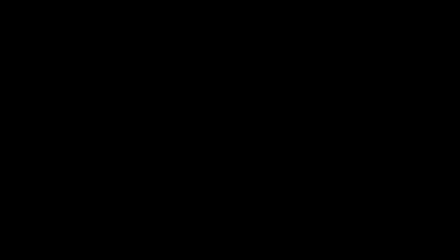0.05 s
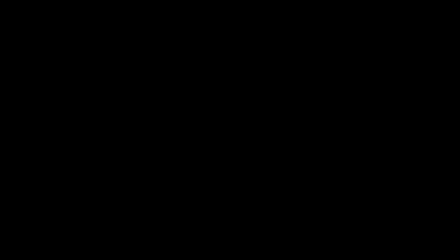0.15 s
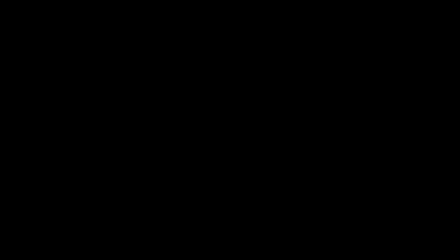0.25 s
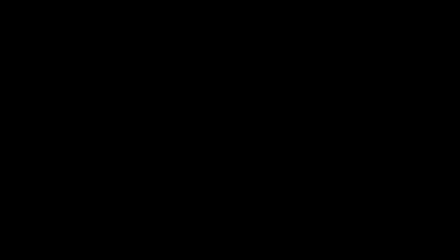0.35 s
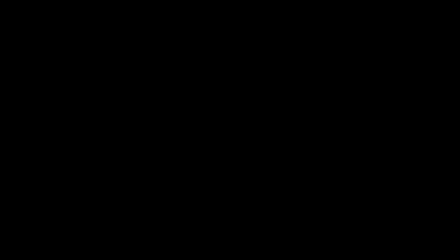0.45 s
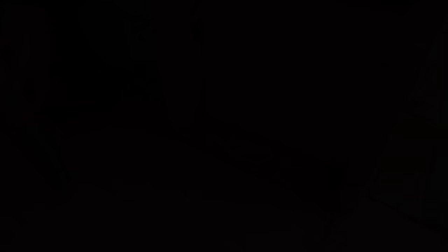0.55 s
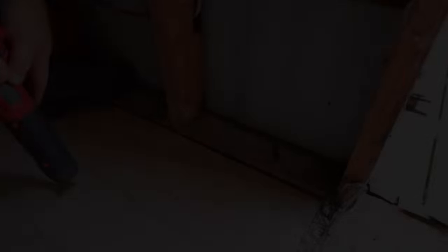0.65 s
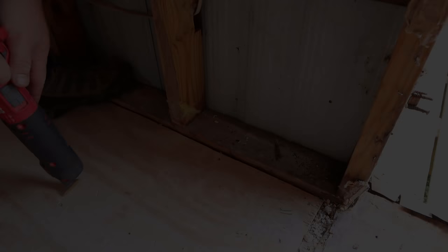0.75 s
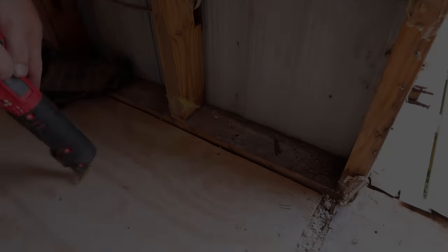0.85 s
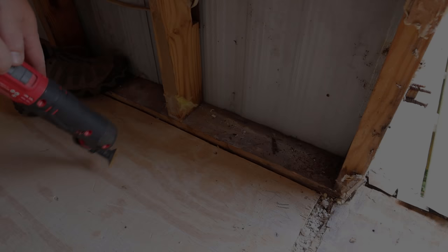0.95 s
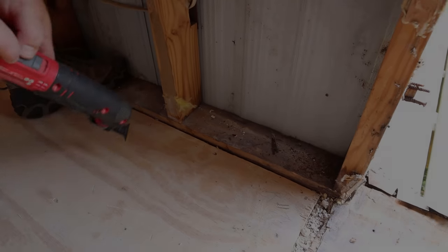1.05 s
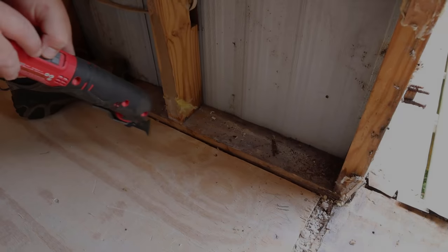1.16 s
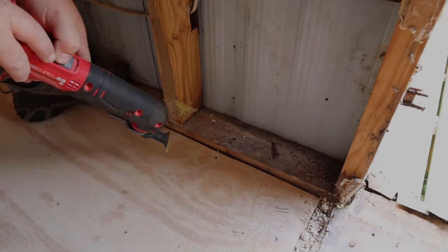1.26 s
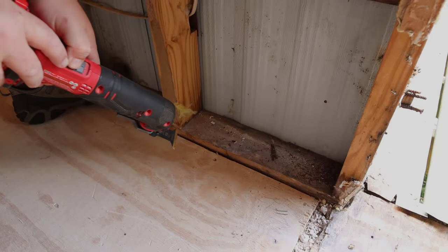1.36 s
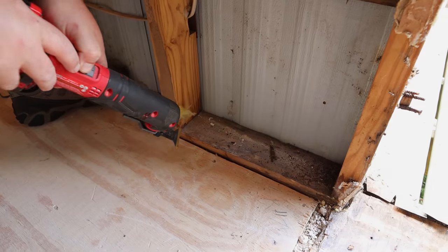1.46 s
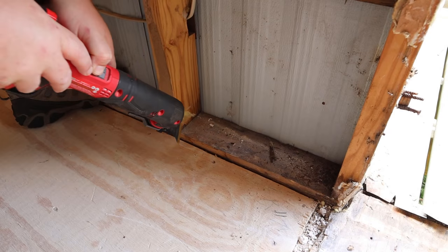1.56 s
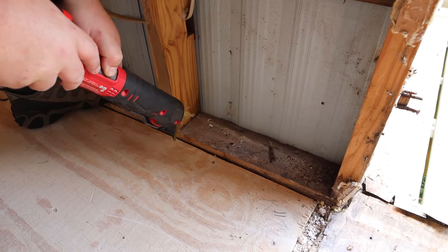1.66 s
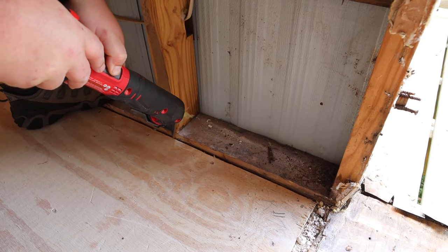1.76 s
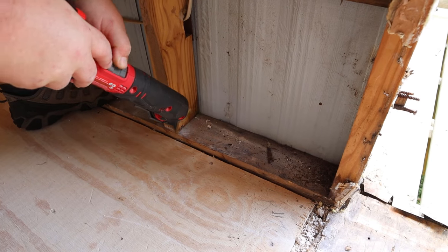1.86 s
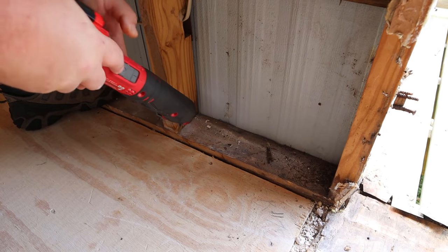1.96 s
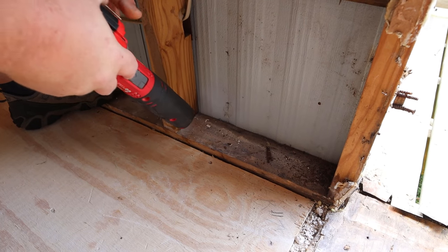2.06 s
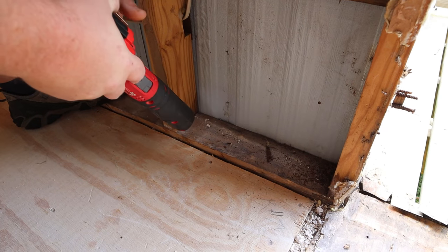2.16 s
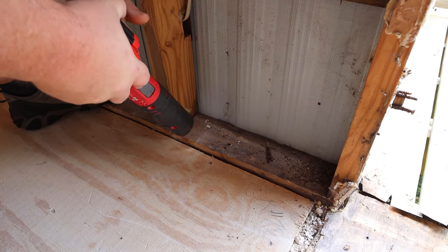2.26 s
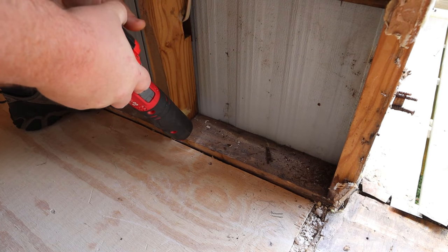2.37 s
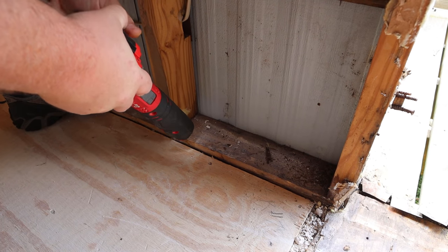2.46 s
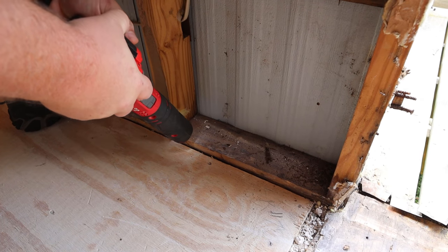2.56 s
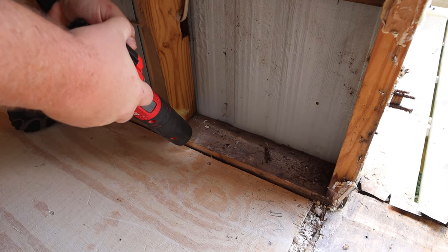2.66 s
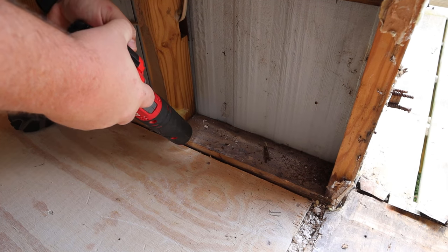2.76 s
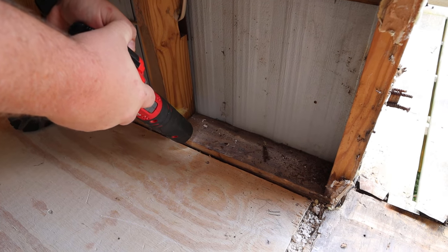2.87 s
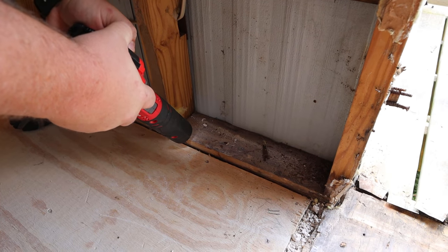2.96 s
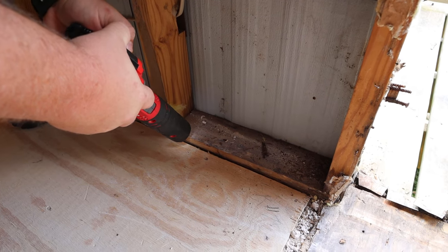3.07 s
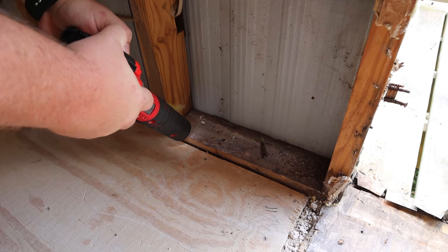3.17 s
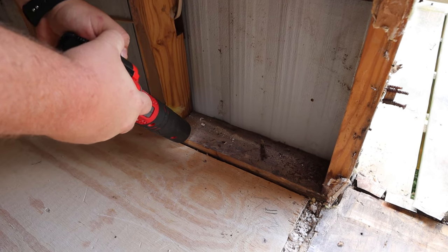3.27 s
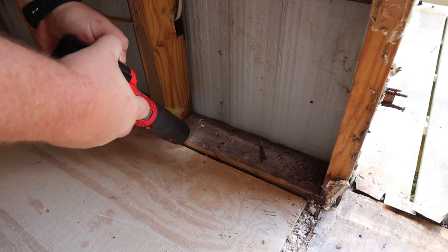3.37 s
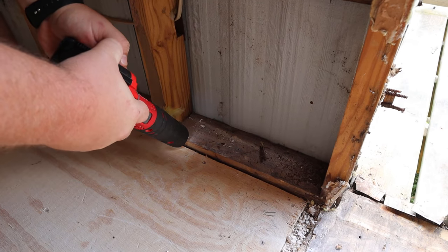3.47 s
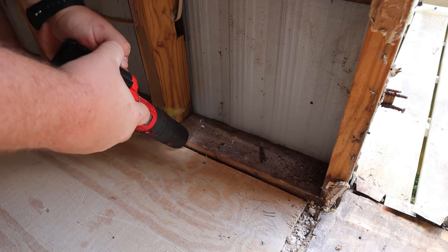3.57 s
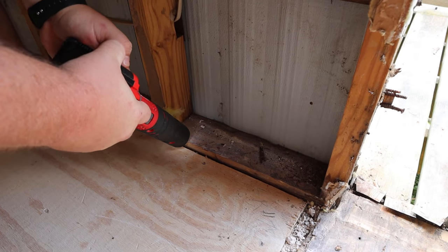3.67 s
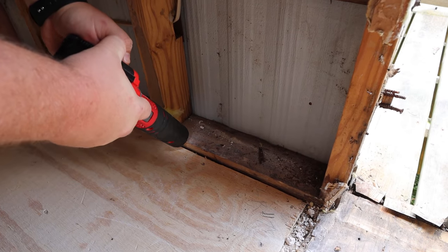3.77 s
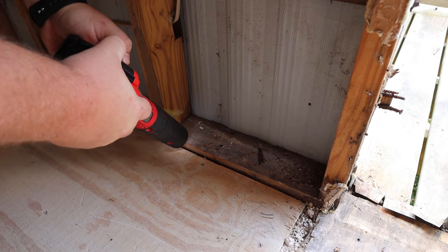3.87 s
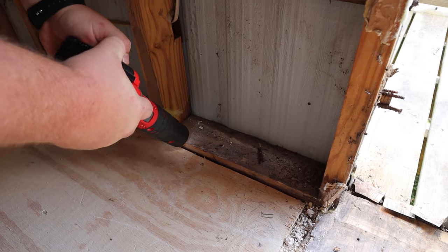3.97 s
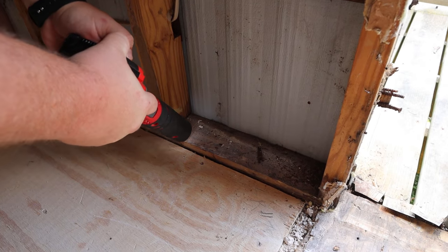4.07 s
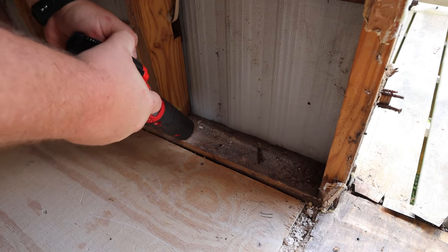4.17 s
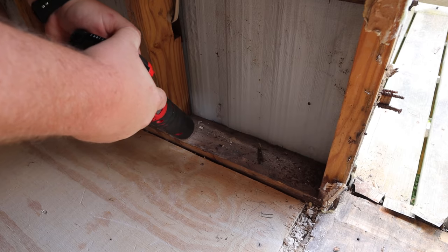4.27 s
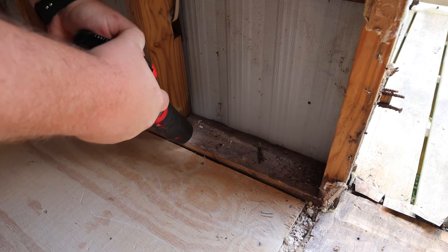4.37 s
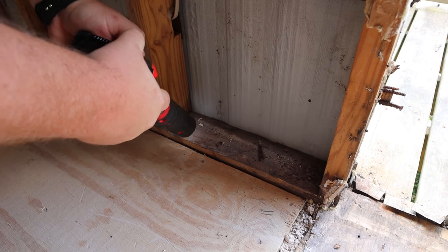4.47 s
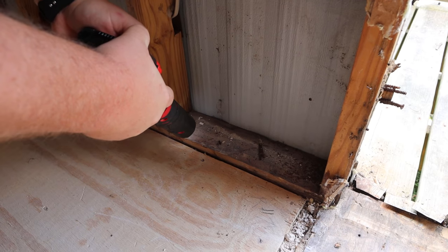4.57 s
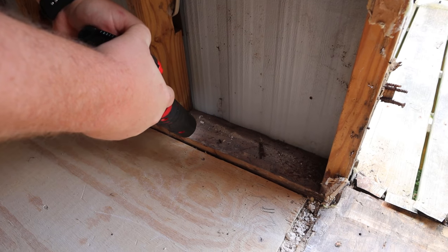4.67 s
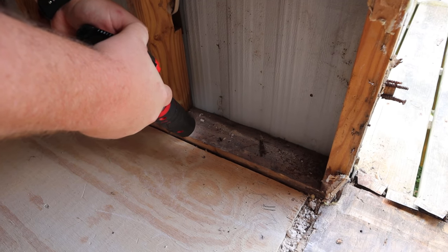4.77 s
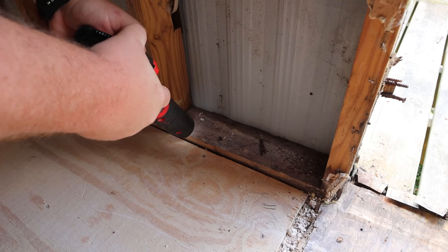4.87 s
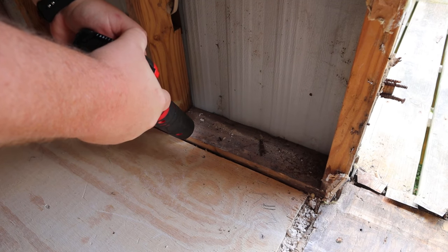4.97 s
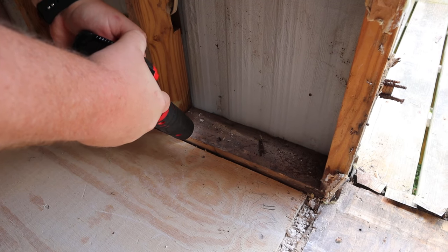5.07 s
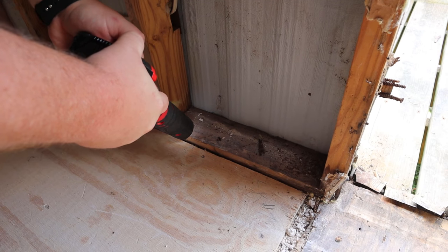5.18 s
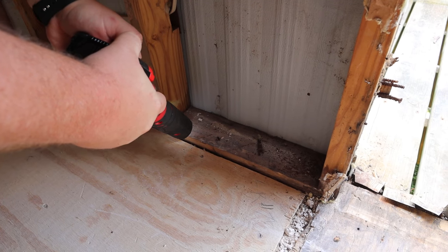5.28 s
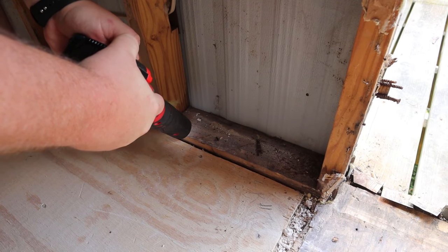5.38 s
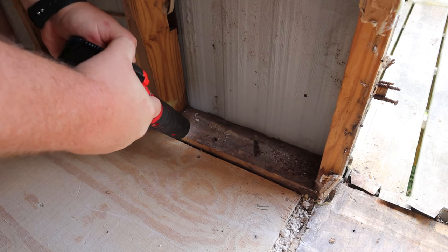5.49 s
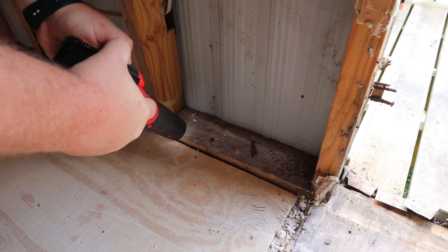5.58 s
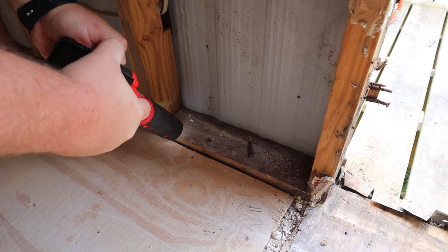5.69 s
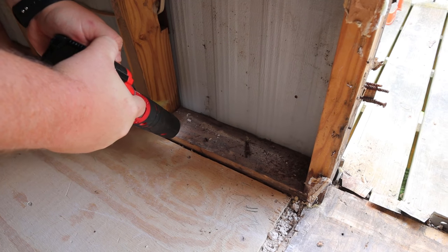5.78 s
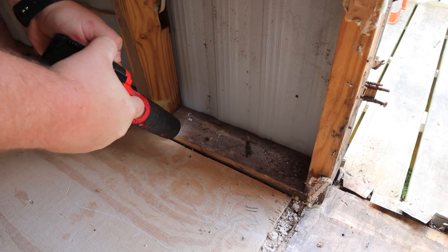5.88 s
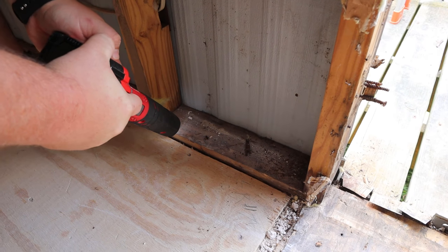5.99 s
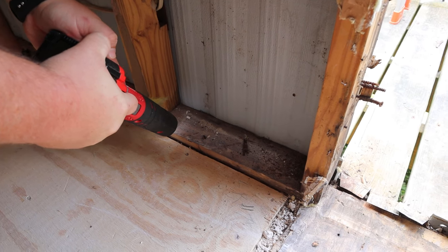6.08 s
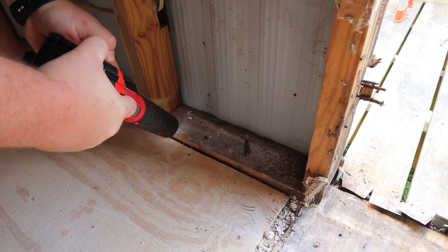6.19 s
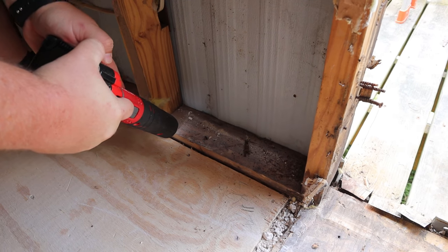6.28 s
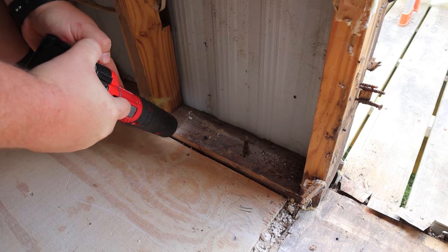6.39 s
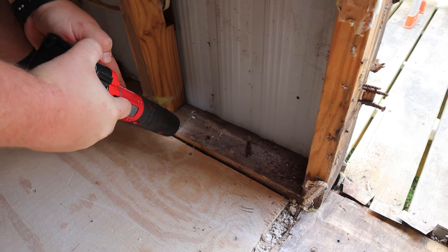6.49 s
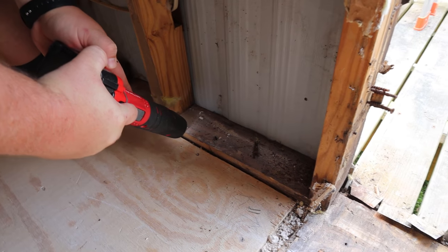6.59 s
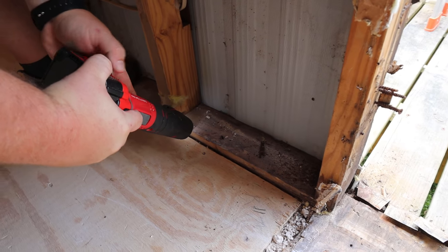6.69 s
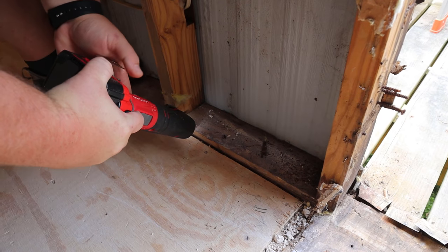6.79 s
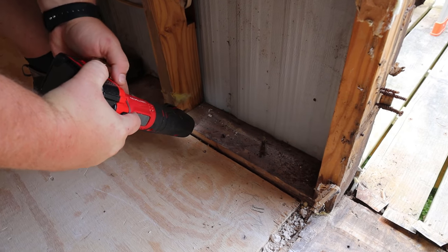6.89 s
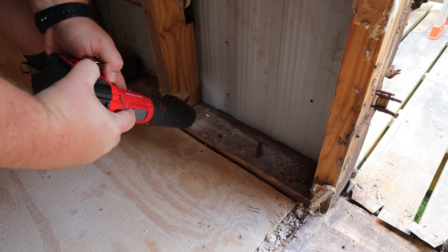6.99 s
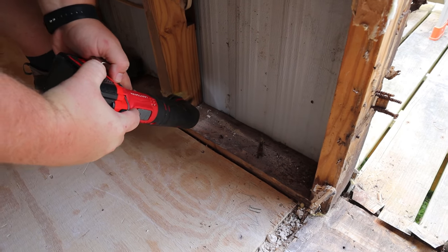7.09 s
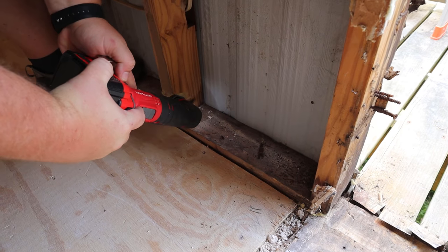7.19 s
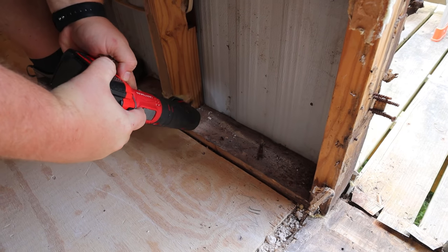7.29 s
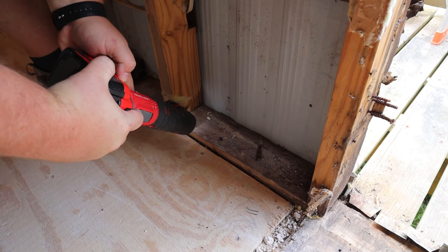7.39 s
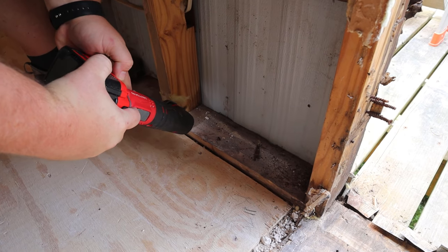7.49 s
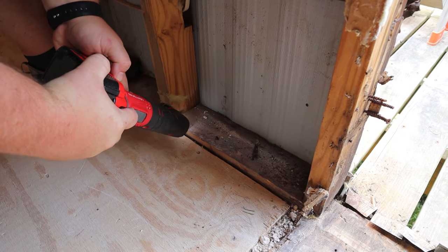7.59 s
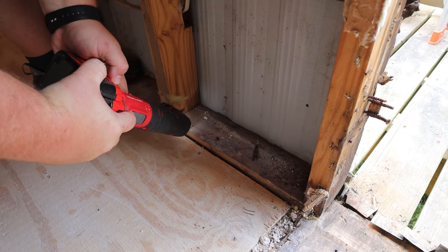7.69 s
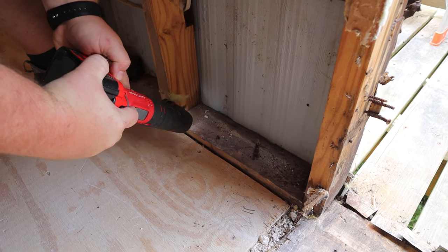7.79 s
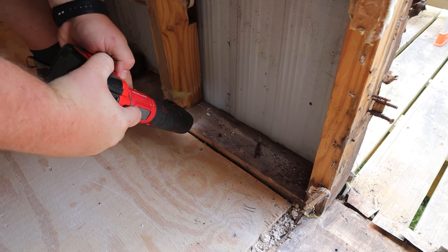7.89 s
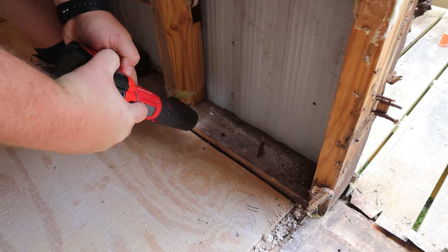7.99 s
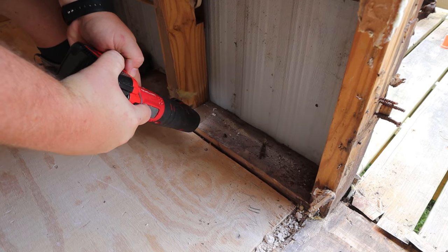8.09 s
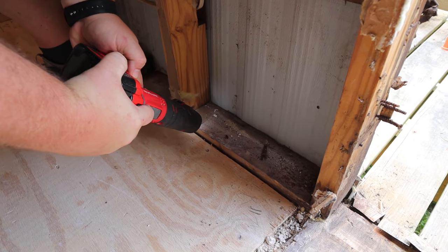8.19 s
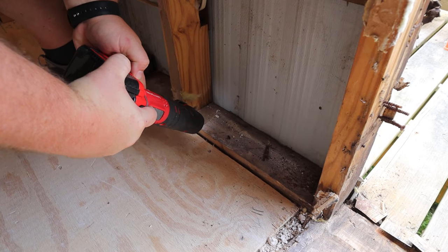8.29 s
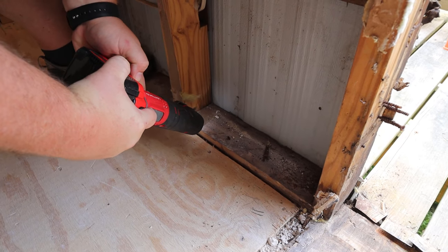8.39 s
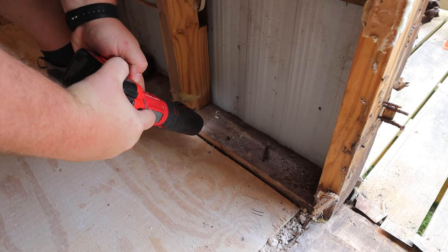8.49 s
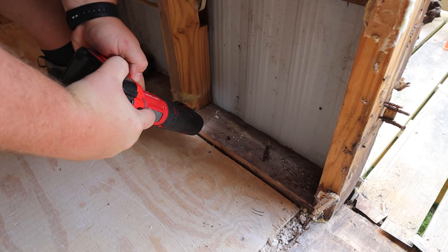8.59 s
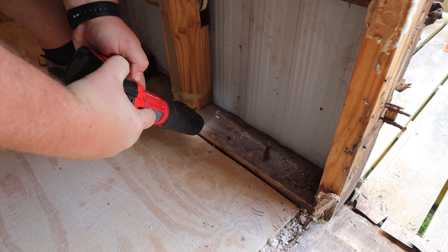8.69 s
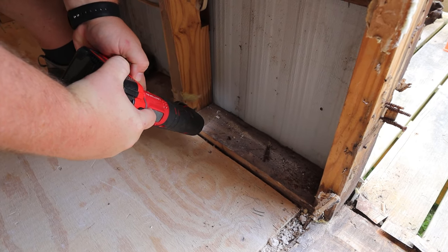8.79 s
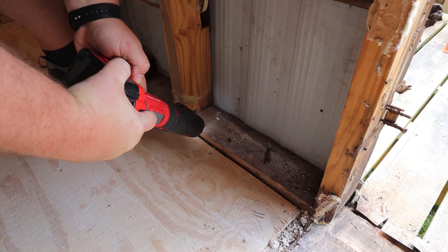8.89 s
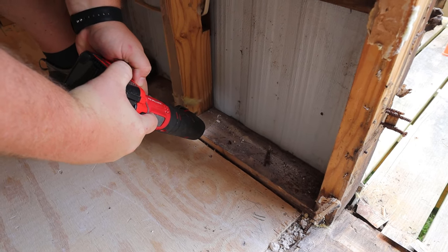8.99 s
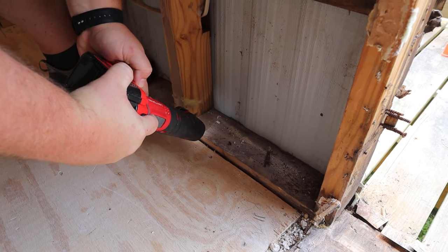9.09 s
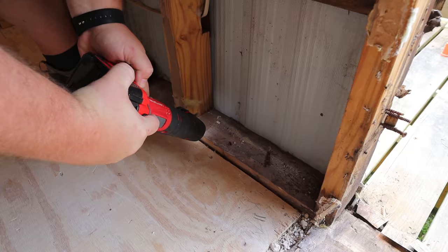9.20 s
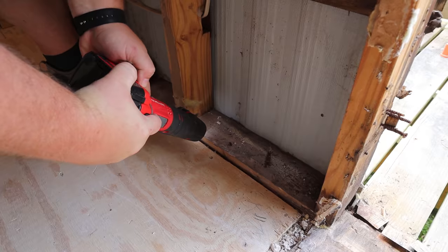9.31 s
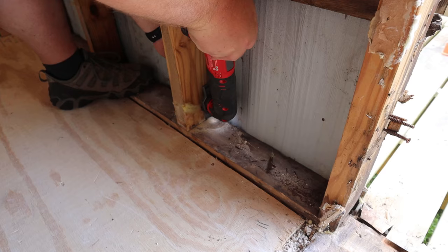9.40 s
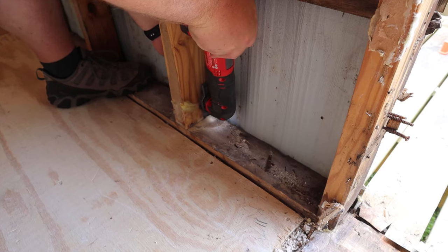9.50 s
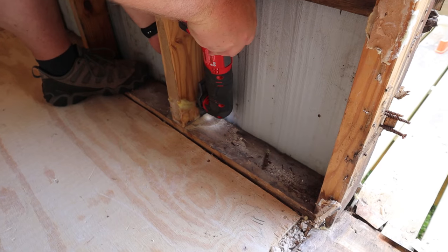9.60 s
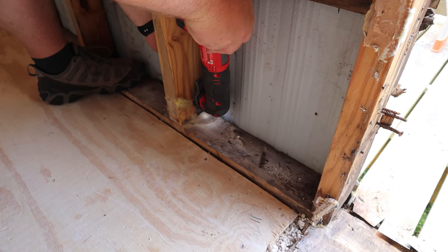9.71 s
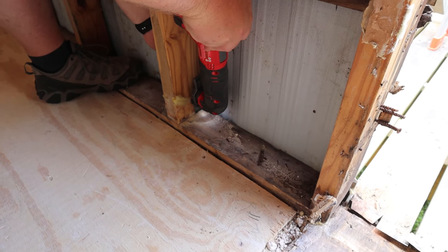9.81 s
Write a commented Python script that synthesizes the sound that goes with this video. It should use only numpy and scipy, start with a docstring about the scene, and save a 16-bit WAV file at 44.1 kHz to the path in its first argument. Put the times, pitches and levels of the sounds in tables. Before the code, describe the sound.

A power multi-tool clicks on and grinds into wood with a coarse, steady buzz and thin whine, straining and recovering until another cut takes over.

```python
"""The soft air of a small shed fades in from silence, then a slide switch snaps in a filtered noise crackle.
A cordless oscillating multi-tool runs up with a swelling clatter and plunges into a wooden sole plate.
Knocks at the swing rate buzz, a loose blade rattles at half of it, and torn fibres rasp as noise bursts.
Sines locked to the swings add shaking and whine, and high noise the thin ring of the blade.
Snags, jams and short runs free break up the cut; at the end it dissolves into the next one."""
import sys
import numpy as np
from scipy import signal
from scipy.fft import rfft, irfft, next_fast_len
from scipy.io import wavfile
from scipy.ndimage import uniform_filter1d

SR = 44100
rng = np.random.default_rng(int(sys.argv[2]) if len(sys.argv) > 2 else 0)


def master_out(mix):
    """Clip the mix to full scale and print it as 16-bit PCM to the path in sys.argv[1]."""
    frames = np.transpose(np.atleast_2d(mix))
    ceiling = np.clip(frames, -1, 1)
    pcm = np.round(ceiling * 32767).astype(np.int16)
    wavfile.write(sys.argv[1], SR, pcm)


N = 434385
TIME = np.arange(N) / SR

# Blade in the kerf, also read by the hand. Each row: time in seconds, level in dB,
# rasp's share of the sound in dB, tooth edge in dB, board boom in dB before a 1 dB trim.
CUT_CURVE = [(1.9, -28.5, -25, 3, -4), (2.18, -31, -5.5, 0.5, 0.2), (2.7, -30, -1, 2, 1.5),
             (2.94, -34, -3.5, 1.1, 4), (3.2, -28.5, -7, -4.4, -2), (3.32, -29.4, -4, 1.6, -4),
             (3.64, -32, -6, -4, -3), (4.06, -31, -5.5, -0.3, 0), (4.54, -32, -2.3, 0, 0),
             (5.38, -30, -9, 0.7, -6.3), (5.46, -32.5, -14, 5.5, 7.4), (5.58, -32.5, -3.5, 1.3, 0.8),
             (6.08, -33, -6, 2.5, -1), (6.48, -33.5, -8, 5, -3.5), (6.62, -34, -3, 2.5, -0.5),
             (6.92, -34.5, -1.5, 0.8, -2), (7.94, -33, -1.5, -1.5, -1), (8.08, -34, -3.5, 2, 1.5),
             (8.2, -33, -6, -3.4, -3), (8.84, -32.5, -15, 1.3, -2.4), (9.38, -37, -2.4, 0, -1),
             (9.82, -32.5, -8.5, -1.5, 0)]
# Colour of the knocks. Each row: frequency in Hz, relative gain in dB.
KNOCK_COLOUR = [(300, -32.5), (900, -3), (1300, 2.5), (2600, 2.5), (3700, -2), (5800, -3), (7000, -7.5),
                (8500, -3), (10000, -19.5), (13000, -21.5), (16000, -26)]
# Colour of rattle and tearing fibres. Each row: frequency in Hz, relative gain in dB.
RASP_COLOUR = [(50, -40), (135, -23), (400, -9.5), (650, -9.5), (1100, 2), (2400, 5), (4000, 2.5),
               (6000, 1.5), (8600, 0), (10200, -11), (13000, -14), (16000, -15.5)]
BUZZ_DB, RATTLE_DB, RASP_DB = -0.5, 1.5, -1   # weight of each layer in the cut


def cutting(cuts, level, rasp_db):
    """Buzz at the swing rate, rattle at half of it, and rasp in bursts on each stroke."""
    hits = loose = bite = 0
    for _, turns, gain in cuts:
        hits += gain * knocks(turns, wander=0.02, jitter=0.0014, uneven_db=0.6)
        to_and_fro = np.cos(np.pi * np.floor(turns))     # the sign flips from one swing to the next
        loose += gain * to_and_fro * knocks(turns, wander=0.019, jitter=0.0035, uneven_db=0.1, count=3)
        bite += gain ** 2 * from_db(6.5 * np.cos(2 * np.pi * turns))
    tearing = bite * from_db(0.47 * drift(143)) * rng.standard_normal(N)
    buzz = through_wood(hits, KNOCK_COLOUR)
    rattle = through_wood(loose, RASP_COLOUR)
    rasp = through_wood(tearing, RASP_COLOUR)

    # gliding teeth thin out the rasp and the finest edge of the knocks
    gliding = glides()
    rasp = rasp * (1 - gliding)
    buzz = buzz - gliding * band(buzz, 8500, 19800)
    rattle = rattle - gliding * band(rattle, 8500, 19800)

    # the harder the teeth bite, the more the blade stutters in the kerf
    stutter = np.clip((rasp_db + 12.5) / 9, 0, 1)
    catch_db = 2.63 * stutter * drift(16.7)     # as the teeth catch, buzz gives way to rasp
    buzz_gain, rattle_gain, rasp_gain = shares(rasp_db)
    sound = buzz_gain * from_db(BUZZ_DB - catch_db) * buzz
    sound = sound + rattle_gain * from_db(RATTLE_DB) * rattle
    sound = sound + rasp_gain * from_db(RASP_DB + catch_db) * rasp
    sound = level * sound + clatter(rasp)

    _, _, edge_db, board_db = in_time(CUT_CURVE)
    board = (from_db(board_db - 1) - 1) * band(sound, 750, 1850)
    edge = (from_db(edge_db + 0.27 * drift(4.8)) - 1) * band(sound, 4100, 19845)
    return (sound + board + edge + jams(buzz)) * from_db(0.53 * stutter * drift(15.0))


def knocks(turns, wander, jitter, uneven_db, count=4):
    """A few contacts per turn; each creeps along the stroke and varies in moment and strength."""
    out = np.zeros(2 * N + 2)      # placed on a doubled time grid
    for _ in range(count):
        place = np.maximum.accumulate(turns + rng.random() + wander * drift(1.315))
        chance = rng.standard_normal((4000, 2))
        turn = np.arange(len(chance)) + jitter * chance[:, 0]
        heard = (turn > place[0]) & (turn < place[-1])
        at = np.interp(turn[heard], place, np.arange(N))
        slow_db = 8.8 * drift(3.97)[at.astype(int)]
        force = from_db(uneven_db * chance[heard, 1] + slow_db)
        # each click is split between two neighbouring grid points
        whole, part = (2 * at).astype(int), 2 * at % 1
        out[whole] += force * (1 - part)
        out[whole + 1] += force * part
    return rms_one(signal.resample_poly(out, 1, 2)[:N])


# Resonances of tool head and board. Each row: centre in Hz, width in Hz, lift in dB.
BODY_RESONANCES = [(1490, 180, 0.5), (2840, 93, -4), (2943, 97, 5)]


def through_wood(force, colour):
    """Contact forces spread through board and tool, then into the shed; level held at 1."""
    spread = disperse(force, smear=0.28)
    reflected = diffuse(spread, t60=0.15, wet_db=-3.5)
    return steady(coloured(reflected, colour, BODY_RESONANCES))


# The blade works loose and rattles. Each row: start in seconds, end in seconds,
# level in dB against the buzz, before the layer weights.
RATTLES = [(1.85, 2.33, -6), (2.8, 3.123, -11.5), (3.322, 3.44, -2), (3.574, 4.45, -5.5),
           (5.718, 5.773, -9), (6.076, 6.443, -16), (7.983, 8.034, 4), (8.19, 8.404, -1),
           (8.578, 9.096, -6.5), (9.101, 9.899, -9.5)]
SEATED_RATTLE_DB = -15   # on the same scale, while the blade sits tight


def shares(rasp_db):
    """Gains of buzz, rattle and rasp, which divide the cut's power between them."""
    loose = from_db(SEATED_RATTLE_DB)
    for start, end, db in RATTLES:
        loose = np.maximum(loose, from_db(db) * held(start, end, edge_s=0.027))
    rasp = np.minimum(from_db(rasp_db), 0.93)
    buzz = np.sqrt((1 - rasp ** 2) / (1 + loose ** 2))
    return buzz, loose * buzz, rasp


# Moments when the teeth glide without tearing. Each entry: time in seconds.
GLIDE_TIMES = [3.179, 3.86, 4.266, 4.925, 5.14, 5.183, 5.249, 5.373, 5.462, 5.71, 6.31, 6.44, 8.02, 8.83]


def glides():
    """Teeth that glide tear little: the share of sound lost, in flat-topped dips about 30 ms long."""
    corners = np.add.outer(GLIDE_TIMES, [-0.016, 0, 0.016]).ravel()
    heights = np.tile([0, 1.3, 0], len(GLIDE_TIMES))
    return np.clip(np.interp(TIME, corners, heights), 0, 0.85)


CLATTER_S, CLATTER_DB = 1.835, -25
CLATTER_RISE_DB_PER_S, CLATTER_FALL_DB_PER_S = 380, 206


def clatter(rasp):
    """The slack drive clatters during run-up: rasp noise with boosted mids swells and dies away."""
    swell = burst(CLATTER_S, CLATTER_DB, CLATTER_RISE_DB_PER_S, CLATTER_FALL_DB_PER_S)
    return swell * (rasp + from_db(12) * band(rasp, 460, 1470))


# The blade jams and hammers on the wood. Each row: middle in seconds, length in seconds,
# gain in dB on the buzz before it is band-passed.
JAMS = [(2.66, 0.044, -44), (4.035, 0.15, -45), (5.48, 0.14, -58), (6.499, 0.084, -43), (6.796, 0.039, -48),
        (6.862, 0.049, -39), (6.978, 0.097, -37), (7.756, 0.048, -40.5), (8.0, 0.067, -41)]
JAM_RING_DB = -4   # the tool head rings along, against the hammering


def jams(buzz):
    """A jammed blade passes its knocks straight into board and tool head."""
    force = 0
    for s, length, db in JAMS:
        force = force + from_db(db) * held(s - length / 2, s + length / 2, edge_s=0.022)
    hammering = band(buzz, 910, 7600)
    head = from_db(JAM_RING_DB) * band(buzz, 2280, 4000)
    return force * (hammering + head)


# Motor under the push of the hand. Each row: time in seconds, blade swings per second.
PUSHED_SPEED = [(1.9, 278.19), (1.96, 280.23), (2.98, 276.93), (3.14, 269.44), (3.34, 274.12),
                (3.62, 271.51), (3.74, 275.26), (4.1, 257.81), (4.22, 256.79), (4.58, 270.54),
                (4.62, 270.67), (4.68, 255.06), (4.82, 255.52), (5.02, 263.67), (5.58, 262.59),
                (5.82, 268.46), (6.72, 263.66), (7.9, 273.87), (8.18, 264.53), (9.18, 268.82)]
# The teeth snag and tear fibres. Each row: middle in seconds, length in seconds,
# speed lost in Hz (negative: gained), extra rasp in dB.
SNAGS = [(2.239, .06, 1, 4), (2.422, 0.17, 1, 2), (3.823, 0.084, 1, 2.5), (4.102, .06, 2, 10),
         (4.242, 0.11, 1, 3.5), (4.548, 0.079, 9, 0), (4.692, 0.078, 1, 1.5), (5.239, .1, -2.5, 5),
         (5.56, 0.17, 10, 1), (5.862, 0.23, 10, 2.5), (5.993, .04, 0, 9), (6.38, 0.062, 1, 4),
         (6.581, 0.101, 5, 0.5), (7.029, 0.16, 9.5, 12), (7.678, 0.073, 15.5, 11), (7.93, .1, 12, 4),
         (8.112, 0.066, 7, 3.5)]
# The hand eases off and the motor runs free. Each row: start in seconds, end in seconds, level change in dB.
LIFTS = [(4.3, 4.501, -2), (7.049, 7.63, -2.5)]
FREE_SPEED_HZ = 279.5


def handling():
    """What the hand does to the tool: speed, share of free running, level of the cut and rasp's share in dB."""
    speed, = in_time(PUSHED_SPEED)
    level_db, rasp_db, _, _ = in_time(CUT_CURVE)
    for s, length, lost_hz, extra_db in SNAGS:
        snag = np.maximum(1 - 2 * np.abs(TIME - s) / length, 0)
        speed = speed - lost_hz * snag
        rasp_db = rasp_db + extra_db * snag
    free = 0
    for start, end, change_db in LIFTS:
        lift = held(start, end, edge_s=0.026)
        free = free + lift
        level_db = level_db + change_db * lift
    return speed + free * (FREE_SPEED_HZ - speed), free, level_db, rasp_db


START_S, SPIN_UP_S, SPIN_UP_LEAD_S = 1.798, 0.12, 0.013   # the climb begins a lead before the sound opens


def spin_up():
    """Share of working speed: it climbs fast and levels off."""
    climb = np.clip((TIME - START_S + SPIN_UP_LEAD_S) / SPIN_UP_S, 0, 1)
    return 1 - (1 - climb) ** 2.2


# Motor in the next cut, which fades in over the first. Each row: time in seconds,
# blade swings per second, share of the power from 0 to 1.
NEXT_CUT = [(9.05, 257, 0.01), (9.3, 255, 0.26), (9.45, 254, 0.33), (9.6, 251, 0.7), (9.72, 260, 0.98),
            (9.85, 261.5, 1)]


def swings(working_speed, run_up):
    """Speed, swings so far and gain of both cuts; phase is summed speed, and the fade shares out power."""
    next_speed, share = in_time(NEXT_CUT)
    share = np.clip(share, 0, 1) * (TIME > NEXT_CUT[0][0])
    cuts = []
    for speed, power in ((working_speed * run_up, 1 - share), (next_speed, share)):
        speed = speed * (1 + 0.001623 * drift(14.1))
        cuts.append((speed, np.cumsum(speed) / SR, np.sqrt(power)))
    return cuts


# Shaking of tool and floor. Each row: order of the swing rate, level in dB,
# change while running free in dB, growth in dB per Hz that the motor labours.
SHAKE_ORDERS = [(1, -47, 1, 0.74), (2, -49.5, -4.5, 0.26), (3, -49, -9, 0), (4, -55.5, 9, 1.02)]
# Whine of the free-running motor. Each row: multiple of the speed, level in dB before trim and speed loss.
WHINE_ORDERS = [(4, -14), (7, -28), (8, -9.5), (9, -16.5), (13, -11.5), (17, -29), (20, -22)]
# One order catches a resonance of the board and sings. Each row: start in seconds, end in seconds,
# order, level in dB.
SINGING = [(1.88, 2.382, 4, -40), (1.876, 2.5, 9, -43.5), (1.974, 2.423, 7, -41), (1.877, 2.17, 13, -40),
           (2.987, 3.855, 2, -42.5), (3.026, 3.295, 9, -42), (3.98, 4.276, 1, -41),
           (4.953, 5.548, 4, -41.5), (6.047, 6.697, 3, -49), (6.002, 7.033, 11, -41.5),
           (8.55, 9.0, 3, -46.5), (8.983, 9.301, 2, -43.5), (9.145, 9.503, 11, -42.5)]
LABOUR_BELOW_HZ = 268   # under this speed the motor labours
SHAKE_FOLLOWS = 0.64   # share of the cut's swings in level that the shaking follows
WHINE_TRIM_DB, WHINE_LOSS_DB_PER_HZ = -4.5, 0.7


def motor(speed, turns, free, level_db):
    """The swinging mass shakes out low orders, more when it labours; the whine stands out running free."""
    labour_hz = np.clip(LABOUR_BELOW_HZ - speed, 0, 11)
    push_db = SHAKE_FOLLOWS * (level_db - level_db.mean())
    slowed_hz = np.maximum(FREE_SPEED_HZ - speed, 0)
    whine_db = level_db + WHINE_TRIM_DB - WHINE_LOSS_DB_PER_HZ * slowed_hz
    gains = []
    for k, db, free_db, growth in SHAKE_ORDERS:
        sway_db = k * (1.1 * drift(12) + 0.4 * drift(3))
        gains.append((k, from_db(db + push_db + free_db * free + growth * labour_hz + sway_db)))
    for k, db in WHINE_ORDERS:
        gains.append((k, from_db(whine_db + db + 2 * drift(13))))
    for start, end, k, db in SINGING:
        gains.append((k, from_db(db + 1.8 * drift(17)) * held(start, end, edge_s=0.11)))
    # parts of the same order add their powers and share one sine
    power = {}
    for k, gain in gains:
        power[round(k)] = power.get(round(k), 0) + gain ** 2
    return sum(tone(turns, k, np.sqrt(p)) for k, p in power.items())


# The board hums along with the next cut. Each row: multiple of its speed, level in dB.
NEXT_HUM = [(1, -43), (2, -52), (3, -46), (4, -49.5), (5, -44), (6, -52.5), (7, -47), (14, -42)]


def next_hum(turns):
    """In the next cut the tool stands upright and sets the board humming."""
    return sum(tone(turns, round(k), from_db(db + 0.64 * drift(5.9))) for k, db in NEXT_HUM)


# level running free, damping as the motor slows, and deepest damping in dB
RING_DB, RING_LOSS_DB_PER_HZ, RING_MOST_LOSS_DB = -49, 1.5, 9


def blade_ring(speed):
    """Rubbing keeps a high mode of the steel blade sounding; the kerf damps it under load."""
    shimmer = rms_one(band(rng.standard_normal(N), 12100, 14400))
    damping_db = np.clip(RING_LOSS_DB_PER_HZ * (FREE_SPEED_HZ - speed), 0, RING_MOST_LOSS_DB)
    return from_db(RING_DB - damping_db + 2 * drift(25) + 2 * drift(4)) * shimmer


# Colour of the plastic housing. Each row: frequency in Hz, relative gain in dB.
HOUSING_COLOUR = [(150, -17), (800, -12.5), (2400, -5), (3150, 8), (3800, -14), (4800, -5), (8800, -5.5),
                  (10500, -22), (15000, -23)]
SWITCH_S, SWITCH_DB = 1.734, -11.5
SWITCH_RISE_DB_PER_S, SWITCH_FALL_DB_PER_S = 12500, 3298
SHED_T60_S = 0.47


def switch():
    """The slider snaps over in a dense crackle of contacts, coloured by the plastic housing."""
    crackle = np.tanh(coloured(rng.standard_normal(N), HOUSING_COLOUR))
    snap = burst(SWITCH_S, SWITCH_DB, SWITCH_RISE_DB_PER_S, SWITCH_FALL_DB_PER_S)
    return diffuse(snap * crackle, t60=SHED_T60_S, wet_db=-15.5)


# Colour of the shed's air. Each row: frequency in Hz, relative gain in dB.
AIR_COLOUR = [(30, -15.5), (200, 0.5), (380, -4.5), (580, -2), (800, -5.5), (1900, -8), (7000, -24.5),
              (16000, -41)]
AIR_START_S, AIR_FADE_S, AIR_LEVEL_DB = 0.58, 0.92, -52
AIR_RECEDES_S, AIR_RECEDE_DB_PER_S, AIR_DROP_DB = 1.73, 81, 17


def air():
    """A soft rush of noise that fades in from silence and recedes when the tool starts."""
    fade = np.clip((TIME - AIR_START_S) / AIR_FADE_S, 0, 1)
    drop_db = np.clip(AIR_RECEDE_DB_PER_S * (TIME - AIR_RECEDES_S), 0, AIR_DROP_DB)
    return fade * from_db(AIR_LEVEL_DB - drop_db) * coloured(rng.standard_normal(N), AIR_COLOUR)


def from_db(db):
    """Decibels to gain."""
    return 10 ** (np.asarray(db) / 20)


def rms_one(x):
    """Scale to rms 1."""
    return x / np.sqrt(np.mean(x ** 2) + 1e-20)


def in_time(rows):
    """Each column of a curve at every sample."""
    s, *columns = np.transpose(rows)
    return [np.interp(TIME, s, c) for c in columns]


def drift(rate):
    """Smooth chance of spread 1 that changes about `rate` times a second."""
    step = 40   # samples between the points of the slow noise
    r = np.exp(-2 * np.pi * rate * step / SR)
    noise = rng.standard_normal(N // step + 2002)
    slow = signal.lfilter([1], [1, -2 * r, r * r], noise)[2000:]   # without the filter's settling
    return np.interp(np.arange(N) / step, np.arange(len(slow)), rms_one(slow))


def held(start, end, edge_s):
    """1 between start and end, with sloping edges."""
    return np.clip(0.5 + np.minimum(TIME - start, end - TIME) / edge_s, 0, 1)


def burst(peak_s, peak_db, rise_db_per_s, fall_db_per_s):
    """Gain that swells to a peak and dies away."""
    slope_db = np.minimum(rise_db_per_s * (TIME - peak_s), fall_db_per_s * (peak_s - TIME))
    return from_db(peak_db + np.maximum(slope_db, -200))


def tone(turns, multiple, gain):
    """A sine locked to a multiple of the swing rate; gain is its rms."""
    return np.sqrt(2) * gain * np.sin(2 * np.pi * (multiple * turns + rng.random()))


def coloured(x, spectrum, resonances=()):
    """Give a steady sound a broad colour with resonant humps; rms 1."""
    size = next_fast_len(N + SR // 10)
    hz = np.arange(size // 2 + 1) * SR / size + 1
    points = np.array(spectrum)
    db = np.interp(np.log(hz), np.log(points[:, 0]), points[:, 1])
    for centre, width, lift in resonances:
        db = db + lift / (1 + (2 * (hz - centre) / width) ** 2)
    return rms_one(irfft(rfft(x, size) * from_db(db), size)[:N])


def band(x, low_hz, high_hz):
    """Band-pass without delay, run forwards and backwards."""
    sos = signal.butter(2, [low_hz, high_hz], "band", fs=SR, output="sos")
    return signal.sosfiltfilt(sos, x)


def steady(x):
    """Hold the short-term rms, over 40 ms, at 1."""
    return x / np.sqrt(np.abs(uniform_filter1d(x * x, SR // 25)) + 1e-6)


def disperse(x, smear):
    """Bending waves arrive spread over a few milliseconds: a chain of all-passes."""
    size = next_fast_len(N + SR // 10)
    w = 2 * np.pi * np.arange(size // 2 + 1) / size
    path = 1
    for lag_s in (0.00023, 0.00061, 0.00107, 0.00173):
        delay = np.exp(-1j * w * round(lag_s * SR))
        path = path * (delay - smear) / (1 - smear * delay)
    return irfft(rfft(x, size) * path, size)[:N]


def diffuse(x, t60, wet_db):
    """Add a dense dying tail of reflections, a third of a second long."""
    t = TIME[:SR // 3]
    tail = rng.standard_normal(len(t)) * from_db(-60 * t / t60)
    return x + from_db(wet_db) * signal.oaconvolve(x, tail / np.linalg.norm(tail))[:N]


def scene():
    """Tool, switch and air, alike in both channels."""
    working_speed, free, level_db, rasp_db = handling()
    run_up = spin_up()
    cuts = swings(working_speed, run_up)
    (speed, turns, gain), (_, next_turns, next_gain) = cuts
    # cutting and shaking only build up close to full speed
    hum = run_up ** 9 * gain * motor(working_speed, turns, free, level_db)
    hum = hum + next_gain * next_hum(next_turns)
    cut = cutting(cuts, run_up ** 4 * from_db(level_db), rasp_db)
    tool = cut + hum + blade_ring(speed)
    return np.tile(tool * (TIME > START_S) + switch() + air(), (2, 1))


CUTOFF_HZ = 15650


def record(dry):
    """The top is cut steeply by an elliptic low-pass."""
    sos = signal.ellip(10, 0.2, 80, CUTOFF_HZ, fs=SR, output="sos")
    return signal.sosfilt(sos, dry)


dry = scene()
out = record(dry)
master_out(out)
```